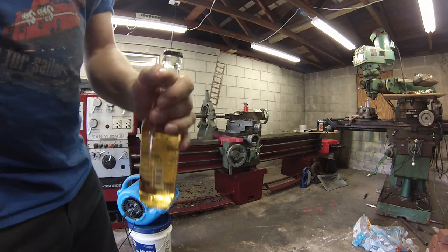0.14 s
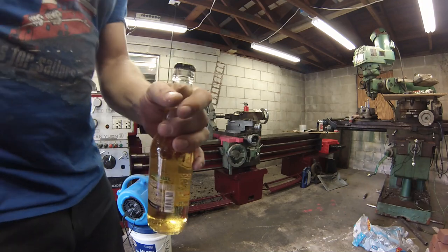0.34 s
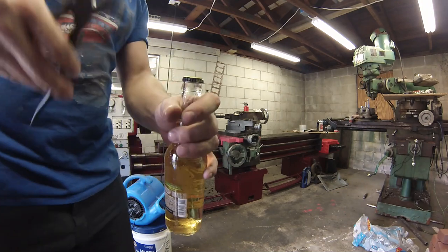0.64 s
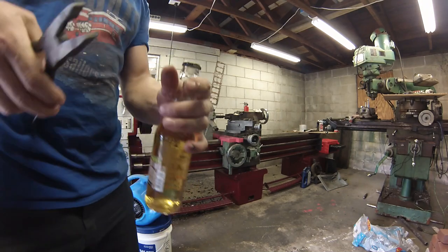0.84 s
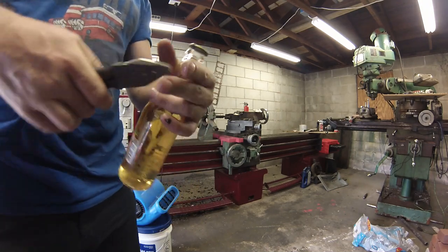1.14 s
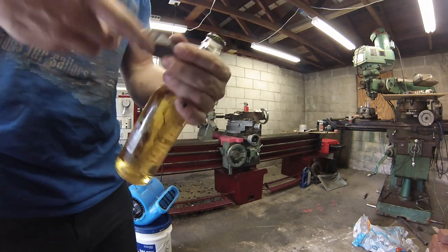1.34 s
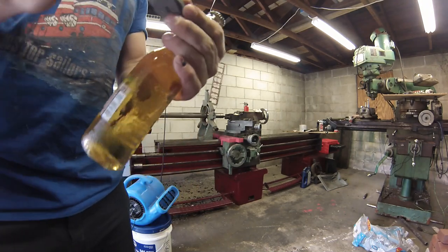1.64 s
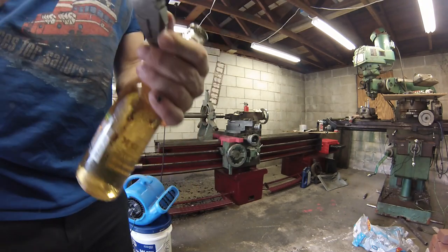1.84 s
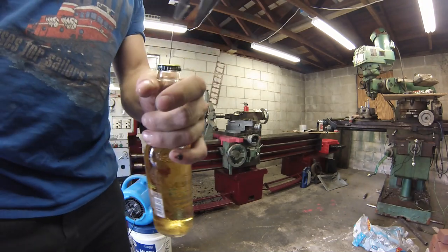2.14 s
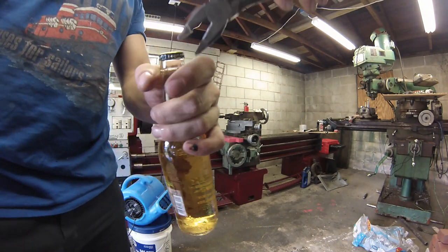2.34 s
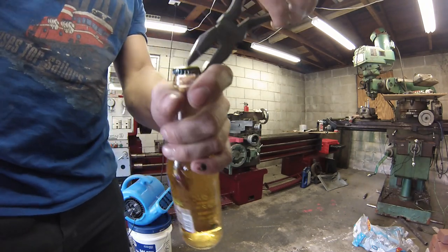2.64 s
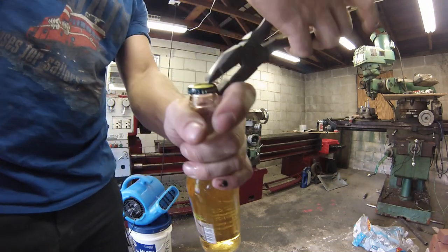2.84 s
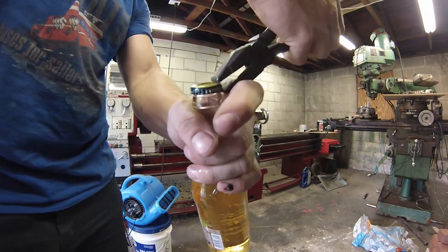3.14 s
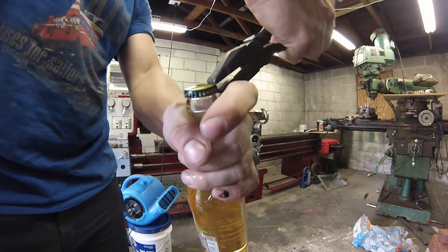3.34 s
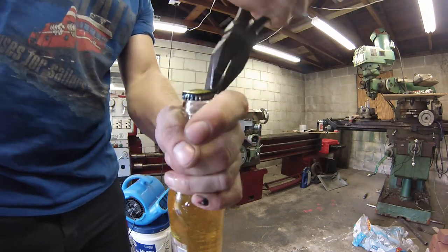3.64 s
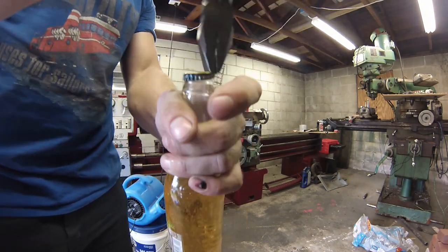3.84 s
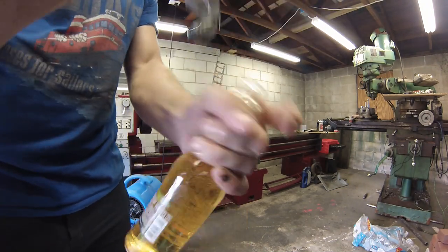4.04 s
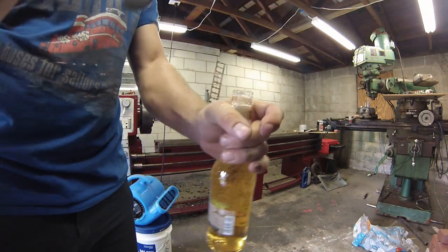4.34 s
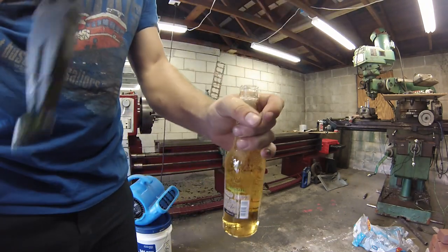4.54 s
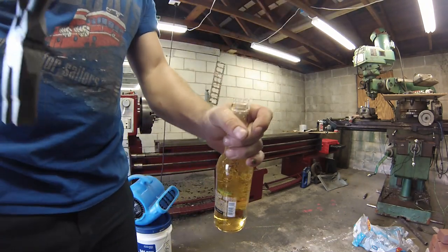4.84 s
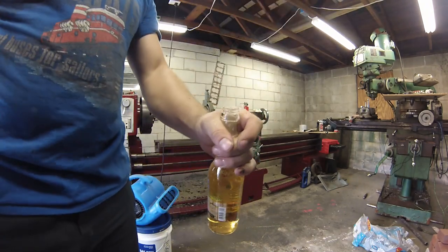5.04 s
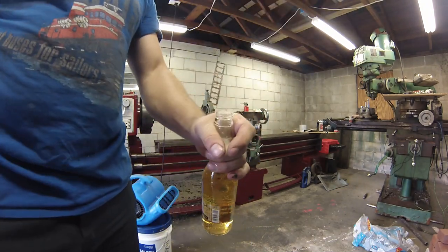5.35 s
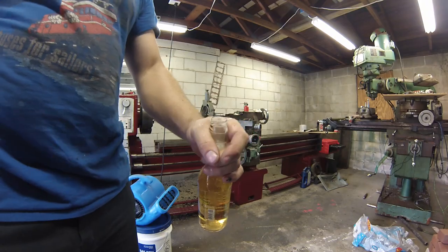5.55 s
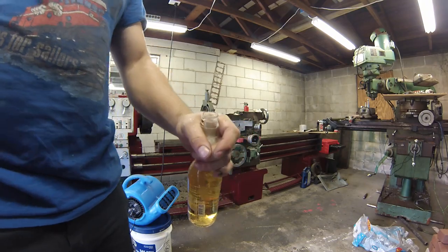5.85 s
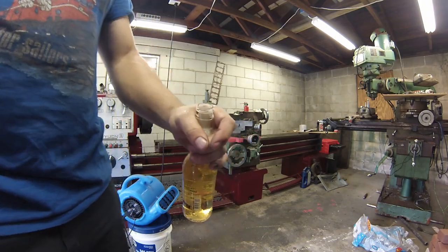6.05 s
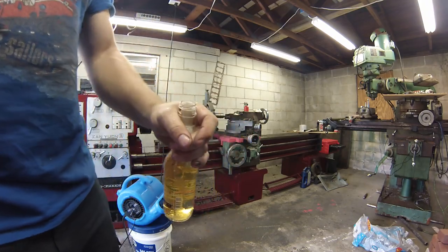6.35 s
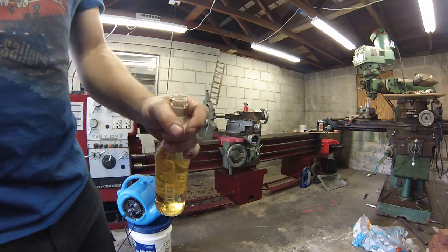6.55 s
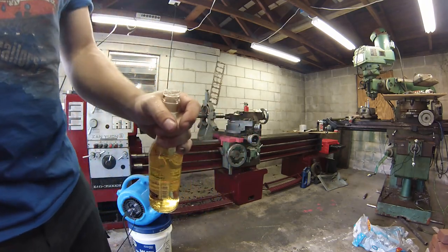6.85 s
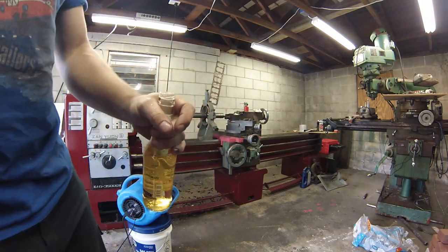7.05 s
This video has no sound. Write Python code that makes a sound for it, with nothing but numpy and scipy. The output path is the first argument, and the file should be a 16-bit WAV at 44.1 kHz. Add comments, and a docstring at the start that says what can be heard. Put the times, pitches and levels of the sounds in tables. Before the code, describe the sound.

Steel pliers clink on a bottle and pry off its cap with a hiss; the cap tinkles down and the tool clatters loudly.

```python
"""A workshop hums. Close to the microphone, the steel jaws of a pair of pliers tap and knock on a
beer bottle, ringing metal and glass. They rock the crown cap until gas hisses out, slip on its rim
and lever it off. The cap drops and skitters over the concrete floor, with a clear echo from the room.
Last, the pliers are tossed onto the bench beside the microphone: their clatter overloads it and
leaves a loose metal part singing."""
import sys
import numpy as np
from scipy import signal
from scipy.fft import rfft, irfft, next_fast_len
from scipy.io import wavfile
from scipy.ndimage import uniform_filter1d

SR = 44100
rng = np.random.default_rng(int(sys.argv[2]) if len(sys.argv) > 2 else 0)


def master_out(mix):
    """Clip the mix to full scale and print it as 16-bit PCM to the path in sys.argv[1]."""
    frames = np.transpose(np.atleast_2d(mix))
    ceiling = np.clip(frames, -1, 1)
    pcm = np.round(ceiling * 32767).astype(np.int16)
    wavfile.write(sys.argv[1], SR, pcm)


N = 317366
TIME = np.arange(N) / SR


def undb(db):
    """Decibels to gain."""
    return 10 ** (np.asarray(db) / 20)


def on_log_axis(points, hz):
    """Read a curve of (Hz, value) points at any frequency."""
    point_hz, value = np.transpose(points)
    return np.interp(np.log(np.maximum(hz, 1)), np.log(point_hz), value)


def noise(colour, size):
    """Noise of rms 1 with the given (Hz, dB) colour."""
    hz = np.linspace(0, SR / 2, size // 2 + 1)
    white = rfft(rng.standard_normal(size))
    coloured = irfft(white * undb(on_log_axis(colour, hz)), size)
    return coloured / coloured.std()


def wander(rate_hz):
    """A smooth random drift with a spread near 1."""
    hold = int(SR / rate_hz)
    steps = np.repeat(rng.standard_normal(N // hold + 1), hold)[:N]
    return uniform_filter1d(steps, hold)


def ease(start_s, length_s):
    """A smooth rise from 0 to 1."""
    return np.sin(np.pi / 2 * np.clip((TIME - start_s) / length_s, 0, 1)) ** 2


def decay(t, t60_s):
    """An envelope that falls 60 dB in t60_s."""
    return np.exp(-np.log(1000) * t / t60_s)


def ring(modes, tilt_db, scatter_db):
    """Decaying modes; where the blow lands decides how strongly each one answers."""
    middle_hz = modes[len(modes) // 2][0]
    out = np.zeros(SR)
    for hz, db, t60_s in modes:
        t = TIME[:min(int(1.5 * t60_s * SR), SR)]
        gain = undb(db + tilt_db * np.log2(hz / middle_hz) + scatter_db * rng.standard_normal())
        out[:len(t)] += gain * np.sin(2 * np.pi * (hz * t + rng.random())) * decay(t, t60_s)
    return out


def blows(events, modes, crack, crack_t60_s):
    """Each blow is a short crack plus a ring, with its own level, brightness and amount of ring."""
    out, t = np.zeros(N + 2 * SR), TIME[:2 ** 13]
    for start_s, db, tilt_db, ring_db in events:  # tilt_db: brightness per octave
        hit = undb(ring_db) * ring(modes, tilt_db / 2, scatter_db=2.5)
        colour = [(hz, level_db + tilt_db * np.log2(hz)) for hz, level_db in crack]
        hit[:len(t)] += noise(colour, len(t)) * decay(t, crack_t60_s)
        start = int(start_s * SR)
        out[start:start + len(hit)] += undb(db) * hit
    return out[:N]


def rebounds(events, gap_s, fall_db, dull_db=0, count=2):
    """Each blow strikes count times, every rebound weaker by fall_db and duller by dull_db per octave."""
    return [(start_s + k * gap_s, db + k * fall_db, tilt_db + k * dull_db, ring_db)
            for start_s, db, tilt_db, ring_db in events for k in range(count)]


def workshop(air_db=-46, waver_db=2, drift_turns=.08):
    """Room tone: rumbling air, the wavering hum of motors and lamps, and a low drone that swells twice."""
    # colour of the air: frequency_hz, level_db
    air_colour = [(20, -11), (40, 0.5), (80, -1.5), (140, -14), (250, -17.5), (500, -24), (1000, -27.5),
                  (3000, -36), (8000, -41), (12500, -42), (13800, -54.5)]
    # mains hum: pitch_hz, level_db
    hum_tones = [(40, -55), (59.2, -51.5), (119.6, -49.5)]
    # drone swells: start_s, length_s, pitch_hz, level_db
    swells = [(3.5, 0.6, 159.5, -52.5), (4.196, 0.64, 170, -52.5)]
    air = noise(air_colour, next_fast_len(N))[:N] * undb(air_db)
    tones = np.zeros(N)
    for hz, db in hum_tones:
        gain = undb(db + waver_db * wander(4.6))
        tones += gain * np.sin(2 * np.pi * (hz * TIME + drift_turns * wander(17)))
    for start_s, length_s, hz, db in swells:
        arch = np.sin(np.pi * np.clip((TIME - start_s) / length_s, 0, 1))
        tones += undb(db) * arch * np.sin(2 * np.pi * hz * TIME)
    return air + np.sqrt(2) * tones


def jaw_taps(hardest_ring_db=-22, ring_per_db=2):
    """The steel jaws feel for a grip; the hand damps the lighter touches more."""
    # light touches: start_s, level_db, tilt_db_per_octave
    taps = [(.372, -48.5, 2), (.617, -38, -5.5), (1.2214, -28, 0), (1.7527, -22, 2.5), (3.0642, -37.5, 13),
            (3.7532, -32.5, 5), (3.881, -41.5, 10), (4.273, -41.5, -4.5), (5.8843, -45.5, 5)]
    # ring of the jaws: pitch_hz, level_db, t60_s
    modes = [(1050, -12, .06), (2830, 1.5, 0.08), (3208, 0.5, 0.19), (3365, 0.5, .2), (3410, -1.5, 0.15),
             (3900, -8, .1), (5300, -5.5, .12), (5330, -12, .12), (6002, -18, 0.079), (6950, -12.5, .12)]
    # contact tick: frequency_hz, level_db
    crack = [(200, -21), (600, -22), (1100, -3), (2000, -14.5), (3200, 1), (5500, -2.5), (7500, -9),
             (10000, -15), (15000, -24.5)]
    hardest_db = max(db for _, db, _ in taps)
    touches = [(start_s, db, tilt_db, hardest_ring_db + ring_per_db * (db - hardest_db))
               for start_s, db, tilt_db in taps]
    return blows(rebounds(touches, gap_s=.0185, fall_db=-14, dull_db=-4), modes, crack, crack_t60_s=.025)


def bottle_knock():
    """The jaws knock against the neck, rebound once and set the glass ringing."""
    # the knock: start_s, level_db, tilt_db_per_octave, ring_db
    knocks = [(2.503, -7.5, 0.5, -14)]
    # ring of the bottle: pitch_hz, level_db, t60_s
    modes = [(1229, 1, 0.23), (1712, -17, 0.32), (2298, -11, 0.157), (2568, -14, .41), (2950, -4.5, 0.12),
             (3125, 7, .06), (3236, -8.5, .19), (3740, -4.5, 0.076), (4183, -5, 0.19), (4644, -9.5, .1),
             (4846, -5.5, 0.109), (5860, -11, 0.13), (5980, -7, 0.18), (8947, -25.5, 0.24)]
    # steel on glass: frequency_hz, level_db
    crack = [(150, -28.5), (450, -6.5), (700, -13.5), (1000, -8.5), (1750, -2.5), (2400, -10), (3200, -0.5),
             (5200, -1), (6100, -12.5), (6900, -20), (12000, -23.5), (15500, -31)]
    return blows(rebounds(knocks, gap_s=.021, fall_db=-21), modes, crack, crack_t60_s=.052)


def cap_release(pop_tilt_db=-1.5, tilt_per_db=.36, ring_db=-19):
    """The cap rocks on the neck and pops off at the last pull; weaker pulls sound duller."""
    # pulls on the cap: start_s, level_db
    pulls = [(2.701, -42.5), (3.675, -44), (3.702, -40.5), (4.0986, -28.5)]
    # the freed rim flicks off the glass: start_s, level_db, tilt_db_per_octave, ring_db
    flicks = [(4.102, -35, 3, 1.5), (4.205, -53.5, -1, -1)]
    # ring of the neck: pitch_hz, level_db, t60_s
    modes = [(610, -1, 0.036), (895, 2, 0.053), (2643, 0.5, 0.071), (3040, -12, 0.071), (3420, -2, 0.043),
             (4580, 2, 0.027)]
    # colour of the pop: frequency_hz, level_db
    crack = [(150, -3), (400, -3), (600, 1.5), (900, -3), (1300, -16), (2200, -13), (3200, -2.5),
             (5000, -18.5), (8000, -20), (15000, -32)]
    pop_db = pulls[-1][1]
    clicks = [(start_s, db, pop_tilt_db + tilt_per_db * (db - pop_db), ring_db) for start_s, db in pulls]
    return blows(clicks + flicks, modes, crack, crack_t60_s=.044)


def gas_hiss(start_s=3.323, attack_s=.047, hold_s=.01, release_s=.054, level_db=-13, body_hz=2500):
    """Carbon dioxide jets from under the lifted rim: the gap opens, holds, and the pressure runs out."""
    # colour of the jet: frequency_hz, level_db
    jet_colour = [(120, -48), (200, -17.5), (1170, -11.5), (1280, -11), (2090, -6.5), (2330, -8),
                  (3180, -2.5), (5700, -3.5), (7090, -1), (13900, -2), (15500, -3)]
    flow = ease(start_s, attack_s) * (1 - ease(start_s + attack_s + hold_s, release_s))
    jet = noise(jet_colour, N)
    body = signal.sosfiltfilt(signal.butter(2, body_hz, fs=SR, output="sos"), jet)
    hiss = flow * (jet - body) + flow ** 2 * body  # only a wide gap gives it body
    spit_db = .3 * wander(600)  # the wet liner flutters
    return hiss * undb(level_db + spit_db)


def rim_slips(tilt_db=2.1):
    """The jaws skid off the crimped rim in a quick run of metallic snaps."""
    # slips: start_s, level_db, ring_db
    slips = [(3.5552, -13, -15.5), (3.566, -13, -34), (3.590, -32, -35)]
    # ring of the rim: pitch_hz, level_db, t60_s
    modes = [(845, 2.5, 0.074), (1683, 9, 0.096), (2790, 5.5, 0.072), (3600, -14, 0.16),
             (4360, -11.5, 0.26), (5040, -8, .2), (6250, -6, 0.19), (7400, -10, 0.17), (8340, -14, .16),
             (8900, -10, 0.17)]
    # colour of the snap: frequency_hz, level_db
    crack = [(150, -3), (550, -31), (850, -3), (1200, -11), (2600, -7), (4500, 1), (8500, -11),
             (11000, -14), (15500, -22)]
    skids = [(start_s, db, tilt_db, ring_db) for start_s, db, ring_db in slips]
    return blows(skids, modes, crack, crack_t60_s=.046)


def cap_on_floor(bounce_tilt_db=.5, settle_s=5.5341, settle_db=-42, settle_tilt_db=-1.5):
    """The thin steel cap drops from the jaws, tinkles over the concrete and rattles to rest."""
    # it scrapes out of the jaws: start_s, level_db, tilt_db_per_octave, ring_db
    drop = [(4.6845, -40, 7.5, -28)]
    # floor bounces: start_s, level_db, ring_db
    bounces = [(5.0637, -44.5, -9), (5.0822, -38.5, -2.5), (5.2288, -33.5, -11), (5.3615, -46.5, -4),
               (5.4259, -45, 2), (5.440, -38.5, 0), (5.448, -39.5, 0.5)]
    # tinkle of the cap: pitch_hz, level_db, t60_s
    modes = [(2120, -25.5, 0.13), (3520, 1, 0.114), (3592, -9.5, 0.19), (5432, -5.5, .11),
             (8550, -13.5, 0.1), (9460, -12, 0.11), (10800, -17, 0.091), (12400, -21, .1)]
    # contact click: frequency_hz, level_db
    crack = [(400, 1.5), (1500, -9), (3300, 3), (4200, -4.5), (5400, 0), (7000, -5.5), (9000, -0.5),
             (12000, -10.5), (15000, -23)]
    hops = [(start_s, db, bounce_tilt_db, ring_db) for start_s, db, ring_db in bounces]
    landing = (settle_s, settle_db, settle_tilt_db, 3.5)  # ring up 3.5 dB
    rattle = rebounds([landing], gap_s=.017, fall_db=-3, count=5)
    return blows(drop + hops + rattle, modes, crack, crack_t60_s=.055)


def handle_thumps(ring_db=-15.5):
    """The pliers land and tumble on the bench, one handle following the other."""
    # landings: start_s, level_db, tilt_db_per_octave
    thumps = [(6.073, -9, 0), (6.0774, 6.5, -1.5), (6.104, 2, 2), (6.16, -19, 5), (6.19, -17, -1.5),
              (6.203, -7, 0.5), (6.245, -0.5, 2), (6.337, -13.5, 2), (6.373, -22, -1.5), (6.382, -8, -2.5),
              (6.403, -24.5, -1)]
    # resonances of the bench: pitch_hz, level_db, t60_s
    modes = [(158.5, -5, 0.12), (191.4, -10.5, 0.23), (270.1, -6.5, 0.27), (315, -12, 0.3),
             (507.7, -1.5, 0.16), (658, 6.5, 0.063), (719, 2, 0.066), (1162, -1, .12), (1217, -8, .14)]
    # colour of the thud: frequency_hz, level_db
    crack = [(40, -22.5), (110, -18), (250, -4), (400, -1.5), (640, 4.5), (900, -3.5), (1200, -2.5),
             (2000, -11.5), (4000, -18), (8000, -37.5), (15000, -50.5)]
    landings = [(start_s, db, tilt_db, ring_db) for start_s, db, tilt_db in thumps]
    return blows(rebounds(landings, gap_s=.009, fall_db=-8.5, dull_db=-4), modes, crack, crack_t60_s=.065)


def head_clatter(tilt_db=.3):
    """The steel head crashes down and the jaws chatter after each hit."""
    # hits: start_s, level_db, ring_db
    clatter = [(6.091, -6.5, -24), (6.203, -8.5, -11.5), (6.215, -17.5, 0), (6.2451, -5.5, -18.5),
               (6.254, 0, -18)]
    # ring of the head: pitch_hz, level_db, t60_s
    modes = [(1163, -5, 0.12), (1220, -1, .13), (2160, -11.5, .2), (2455, -2, 0.21), (2891, -18.5, .3),
             (3253, 3, .11), (3980, -10.5, .15), (4585, -8.5, 0.36), (6464, -14.5, 0.27),
             (8560, -29.5, .75)]
    # colour of the crash: frequency_hz, level_db
    crack = [(80, -19), (300, -3.5), (700, -0.5), (1300, 3), (2000, -5.5), (4000, -4.5), (6500, -12.5),
             (10000, -19.5), (15000, -29)]
    hits = [(start_s, db, tilt_db, ring_db) for start_s, db, ring_db in clatter]
    chatter = rebounds(hits, gap_s=.011, fall_db=-7, dull_db=-.45, count=3)
    return blows(chatter, modes, crack, crack_t60_s=.12)


def loose_part(start_s=6.264, level_db=-1):
    """Struck by the head, a loose metal part on the bench clangs and sings on in close modes."""
    # short clang and long shimmer: pitch_hz, level_db, t60_s
    modes = [(1550, 0, .14), (3690, -1.5, .09), (680, -54, 2.6), (1507, -44.5, 2.6), (1530, -44, 2.3),
             (1560, -41.5, 1.4), (1650, -39, 1.2), (1690, -38, 1.4), (3063, -56, 1.2)]
    clang = ring(modes, tilt_db=0, scatter_db=0)
    return undb(level_db) * np.pad(clang, (int(start_s * SR), SR))[:N]


def room(send, predelay_s=.0061):
    """Diffuse reverb from the block walls: octave bands of noise, the treble dying first."""
    # decay of the room: frequency_hz, t60_s
    decay_times = [(100, 0.44), (500, 0.39), (2000, 0.39), (6000, 0.29), (14000, 0.34)]
    t = TIME[:SR]
    white = rfft(rng.standard_normal(SR))
    octave = np.log2(np.clip(np.arange(len(white)), 125, 16000))  # bins are 1 Hz apart
    tail = np.zeros(SR)
    for hz in 125 * 2 ** np.arange(8):
        band = irfft(white * np.maximum(1 - abs(octave - np.log2(hz)), 0), SR)
        tail += band * decay(t, on_log_axis(decay_times, hz))
    tail *= np.clip(t / predelay_s - 1, 0, 1)
    return signal.fftconvolve(send, tail / np.linalg.norm(tail))[:N]


def scene():
    """Near sounds are almost dry; the cap on the floor gets the most reverb."""
    bottle = jaw_taps() + bottle_knock() + rim_slips() + cap_release()
    hiss, cap = gas_hiss(), cap_on_floor()
    bench = handle_thumps() + head_clatter() + loose_part()
    walls = room(undb(-15) * bottle + undb(-20) * hiss + undb(-2.5) * cap + undb(-13) * bench)
    return (bottle + hiss + undb(1.5) * cap + bench + walls + workshop())[None]


def record(dry, open_s=.23, fade_s=.02, top_hz=15300):
    """The microphone opens after a moment, clips at full scale and loses the top treble."""
    fade_in = np.clip((TIME - open_s) / fade_s, 0, 1)
    clipped = np.clip(dry * fade_in, -1, 1)
    return signal.sosfilt(signal.ellip(8, .2, 70, top_hz, fs=SR, output="sos"), clipped)


dry = scene()
out = record(dry)
master_out(out)
```